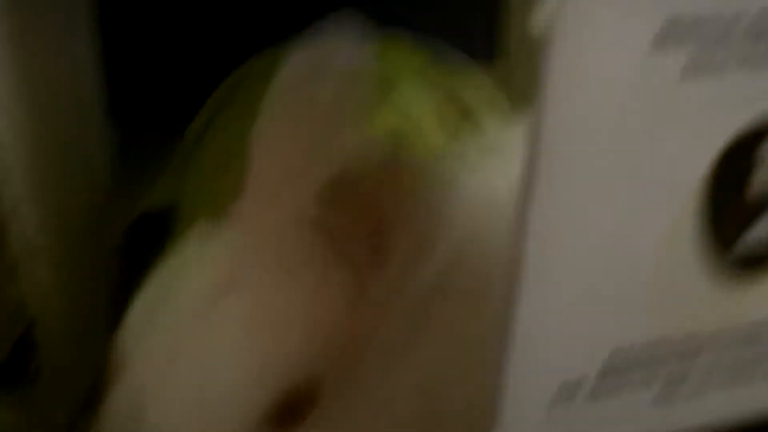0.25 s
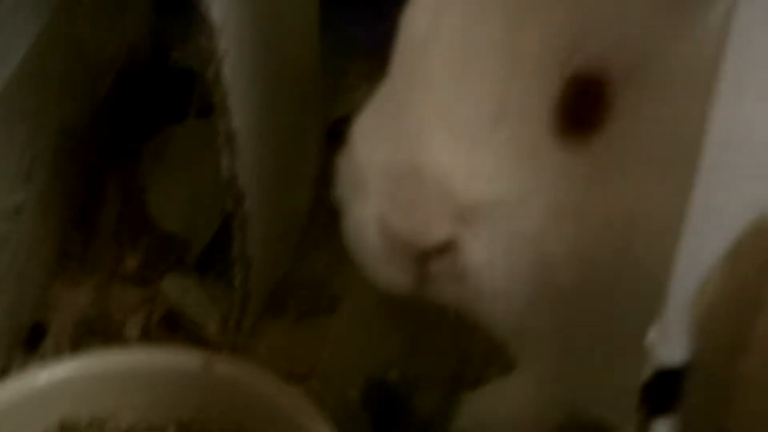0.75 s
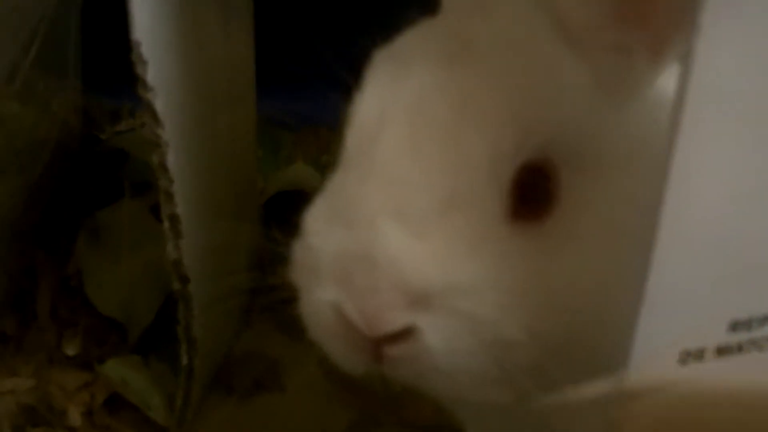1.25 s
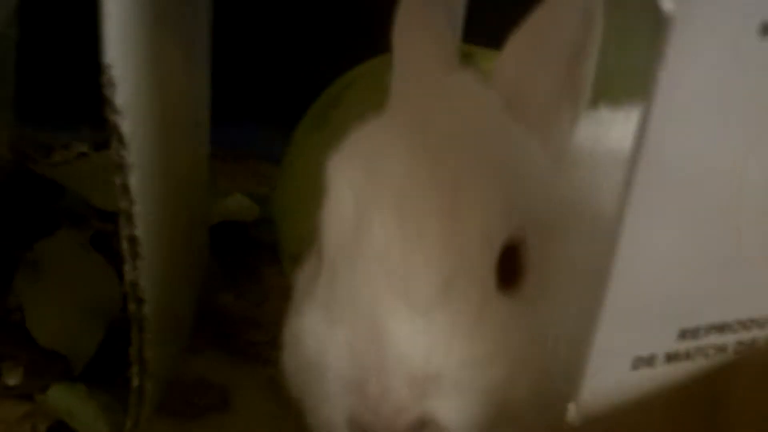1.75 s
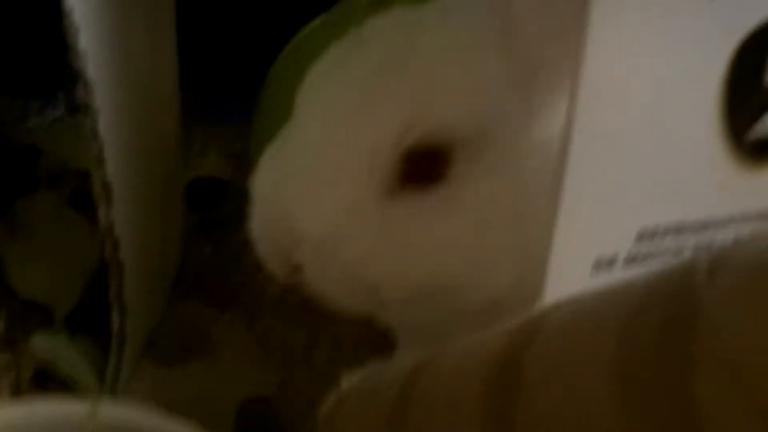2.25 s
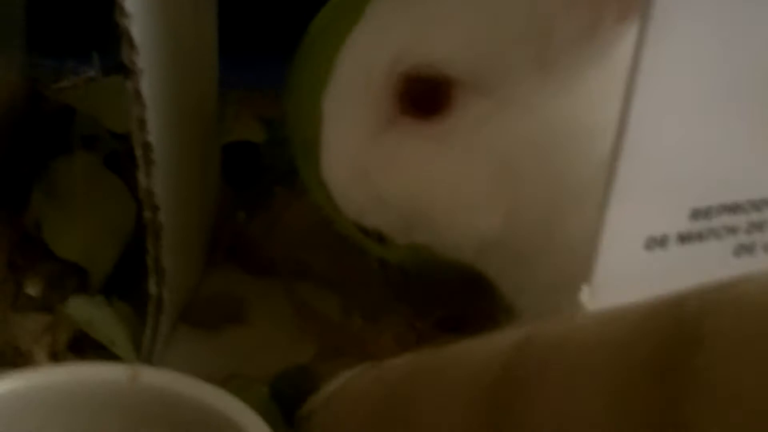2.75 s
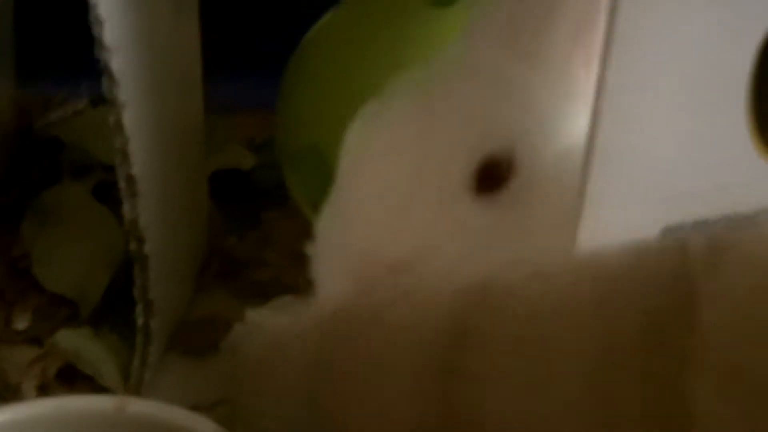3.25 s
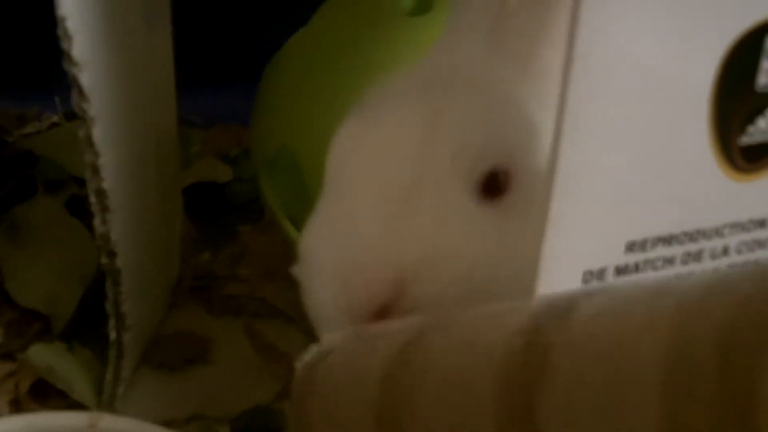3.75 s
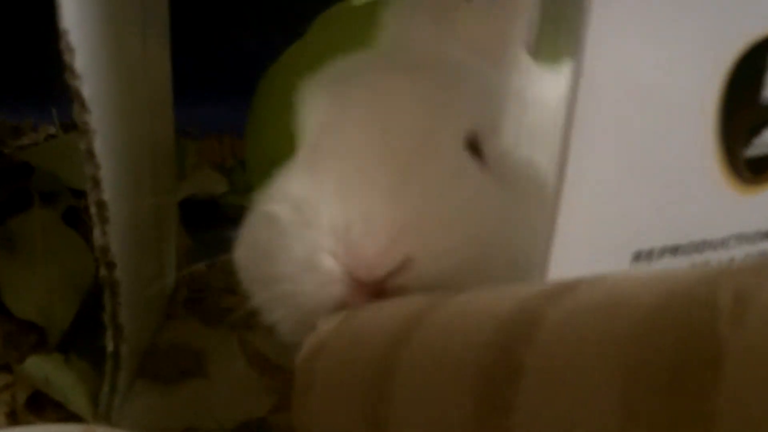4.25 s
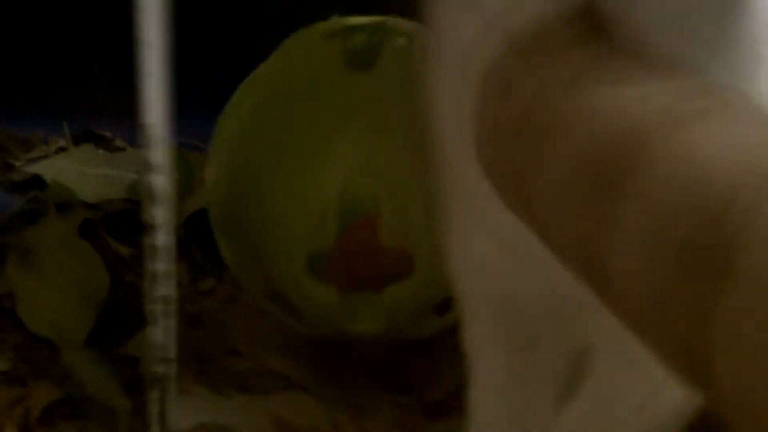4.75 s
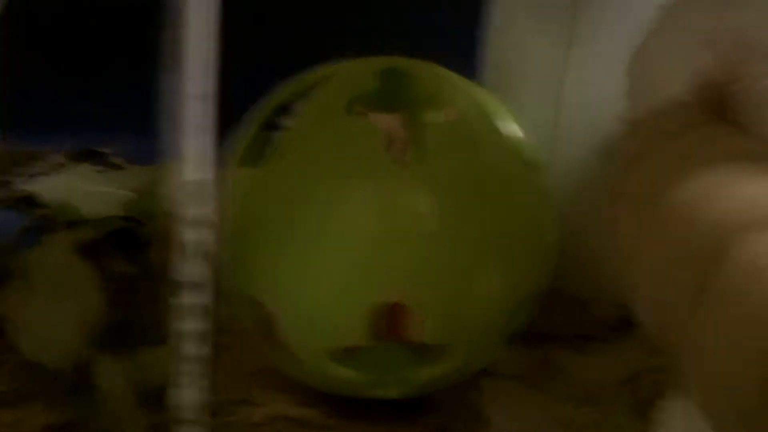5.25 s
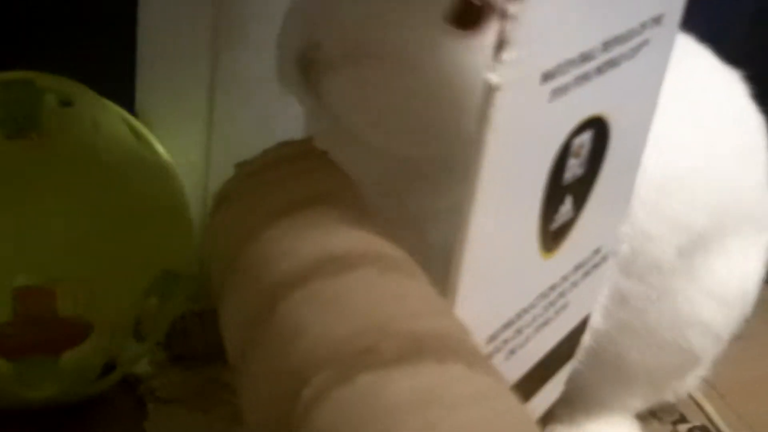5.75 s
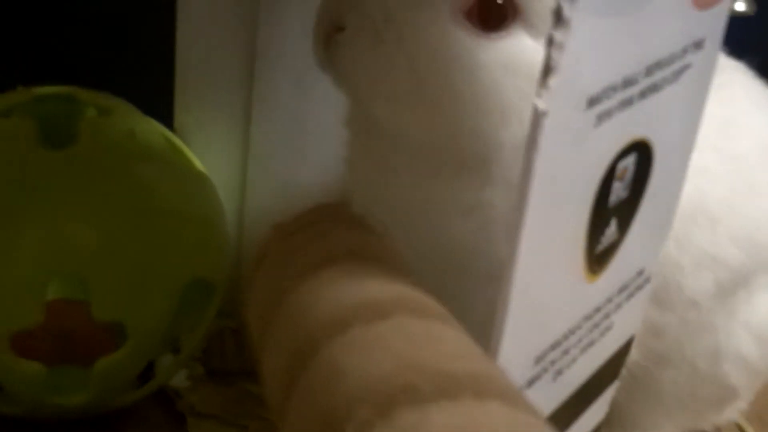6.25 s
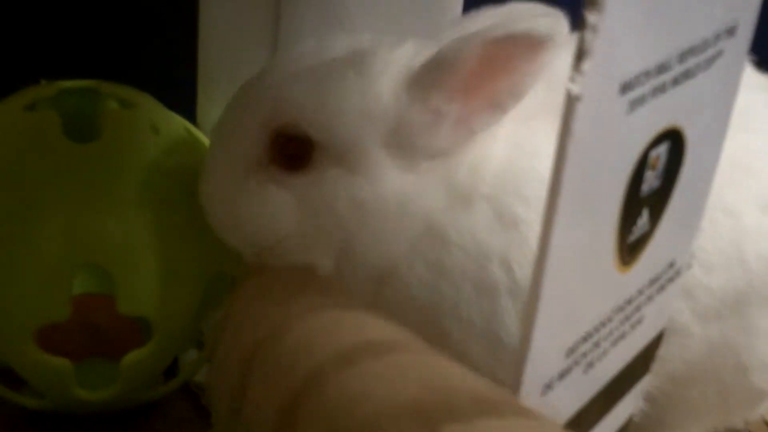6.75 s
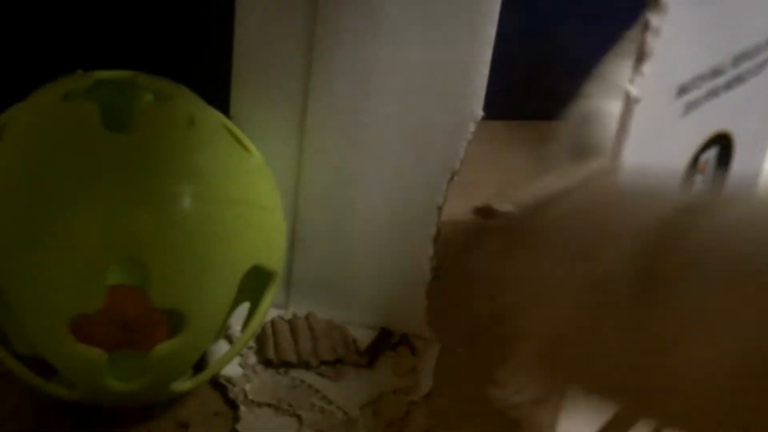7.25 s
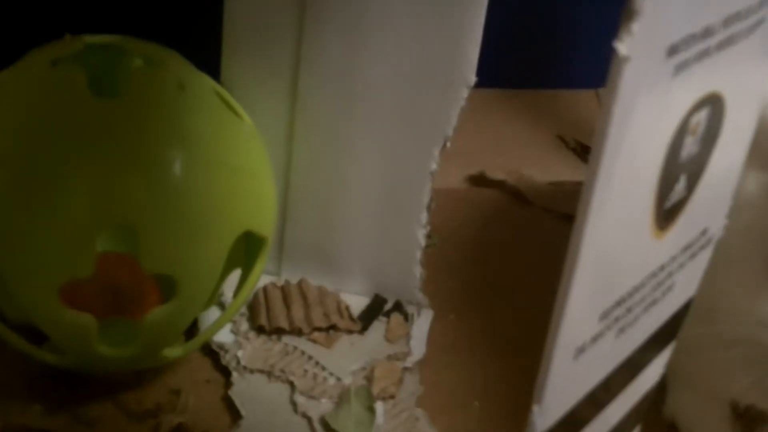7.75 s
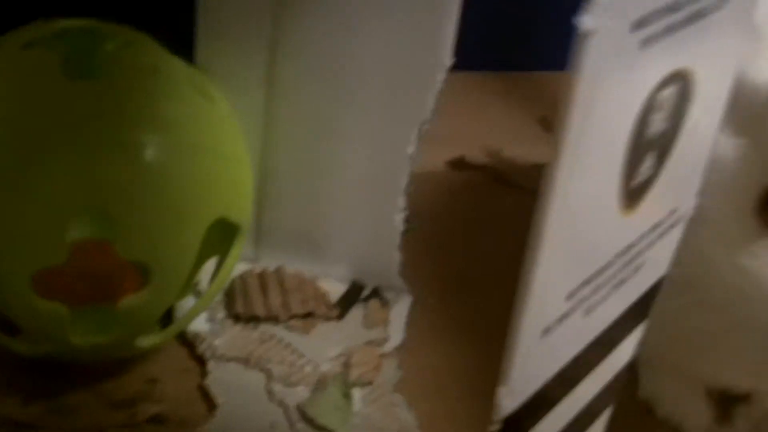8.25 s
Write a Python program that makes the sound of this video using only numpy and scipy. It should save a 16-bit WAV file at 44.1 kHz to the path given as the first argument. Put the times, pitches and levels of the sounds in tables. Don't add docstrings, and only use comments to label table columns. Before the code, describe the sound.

A small rabbit scrapes and nibbles cardboard close to the microphone, with sharp snaps, hollow box drones, soft thumps and tiny bell tinkles.

```python
import sys
import numpy as np
from scipy import signal
from scipy.fft import rfft, irfft
from scipy.io import wavfile

SR = 44100
rng = np.random.default_rng(int(sys.argv[2]) if len(sys.argv) > 2 else 0)


def nominal_scale(level):
    x = np.asarray(level, float) / 20
    return 10 ** x


def pcm_store(signal):
    levels = np.round(np.clip(np.atleast_2d(signal), -1, 1) * 32767)
    wavfile.write(sys.argv[1], SR, levels.astype(np.int16).T)


N = 375732

# t/s, peak/dB, panel
# ring f/Hz, body re peak/dB
TICKS = [(0.0004, -17.5, 4170, -13.5), (0.1045, -26, 3230, -45), (0.7225, -43.5, 4850, -7),
         (1.4695, -12.5, 3250, -27), (1.482, -12, 3540, -26), (1.495, -13, 3550, -18),
         (1.5289, -9.5, 5760, 0.5), (2.623, -33, 2600, -12), (2.873, -22.5, 2805, -8),
         (3.1928, -35, 1670, -2), (3.363, -41.5, 3620, -24), (3.594, -30.5, 3000, -3.5),
         (3.9096, -39.5, 3400, -23), (4.0191, -27, 3320, -12), (4.04, -25, 1320, -7),
         (4.057, -26, 1410, -10), (4.7553, -18, 1360, -7), (4.86, -25.5, 1460, -23),
         (4.8787, -19, 4860, -37), (4.894, -25, 1030, -11), (5.156, -33, 4850, -3),
         (5.178, -22.5, 4070, -3), (5.403, -24, 4830, -39), (5.5338, -39, 1020, 0), (5.7168, -40, 5100, -7),
         (7.147, -28.5, 2110, 6), (7.778, -43, 1520, -20), (7.827, -39, 1760, -40),
         (8.123, -27.5, 1630, -1.5), (8.1625, -25.5, 1630, -8),
         (.2693, -34, 3500, -30), (0.3424, -31, 3660, -30), (1.4698, -20, 1650, -31),
           (1.483, -18.5, 1700, -26), (1.4945, -16, 2400, -27), (1.5334, -15.5, 2200, -7),
           (1.567, -22.5, 4940, -17), (1.585, -25, 6000, -17), (1.7227, -27, 4450, -20),
           (1.7318, -22.5, 3460, -27), (1.746, -27.5, 3300, -25), (1.815, -34, 5460, -20),
           (1.9538, -32, 2080, -15), (2.1633, -45, 4900, -25), (2.1836, -39, 4900, -25),
           (2.2686, -41, 4850, -25), (2.9744, -22.5, 2200, -4.5), (2.980, -25.5, 3600, -10),
           (2.991, -32.5, 4900, -1), (3.000, -37, 4900, -7), (3.030, -31, 2000, -15),
           (3.066, -39, 2200, -12), (3.081, -30.5, 2200, -20), (3.155, -33.5, 2260, -13),
           (4.746, -20, 5860, -25), (4.768, -22, 2600, -23), (4.808, -23.5, 6240, -27),
           (4.8284, -21, 2900, -22), (4.8492, -26, 3900, -28), (4.8943, -23, 3500, -26),
           (4.9428, -30, 3600, -22), (4.9955, -29.5, 1580, -20), (5.123, -23, 2930, -15),
           (5.129, -21.5, 4950, -24), (8.2292, -37, 1000, -10), (8.4008, -31.5, 5200, 2),
           (8.48, -33, 5000, -20), (4.7695, -18, 4900, -30), (4.880, -22, 1290, -15),
           (4.4605, -41, 2100, -20), (4.317, -40, 2000, -15), (3.712, -45.5, 1600, -7),
           (3.473, -28.5, 1580, -8), (3.0485, -25, 4970, -20), (2.0654, -29.5, 2850, -22),
           (2.092, -28.5, 4900, -17)]
# t/s, peak/dB, panel ring f/Hz, body re peak/dB
TEARS = [(0.2335, -30, 1560, -42), (0.5438, -42.5, 4320, -20), (0.9988, -40.5, 1550, -2),
         (1.452, -22, 5600, -5), (1.592, -13.5, 4730, -16), (2.5617, -39, 3490, -7),
         (2.748, -33.5, 3300, 4.5), (2.8362, -25.5, 1690, -4), (3.0484, -21, 2797, -8.5),
         (3.1485, -34, 2780, -3), (3.472, -27, 4800, 0), (4.105, -42.5, 4840, -10),
         (4.7675, -22, 5000, -23), (5.0707, -23.5, 1120, -7.5), (5.2365, -21.5, 2770, -22),
         (5.3387, -33.5, 2840, -6), (5.39, -23, 2774, -18.5), (5.7787, -23, 4680, -28),
         (5.878, -31, 3670, -10), (5.9962, -40, 4900, 0.5), (7.2046, -38, 780, -11),
         (7.225, -31.5, 3600, -2), (7.6172, -34, 5130, -25), (7.808, -28.5, 3540, -24),
         (8.186, -32.5, 1650, -18)]
TICK_T60_S, TICK_HISS_DB, TICK_HISS_DB_PER_OCTAVE = 0.042, -21, 4
TEAR_T60_S, TEAR_HISS_DB, TEAR_HISS_DB_PER_BODY_DB = 0.2, -27, 0.53

# middle t/s, length/s, rms/dB, panel ring f/Hz
SCRATCHES = [(.03, 0.035, -43, 4400), (.03, 0.055, -45.5, 1550), (1.748, 0.028, -38, 4970),
             (1.802, 0.03, -46, 5100), (1.875, 0.02, -33.5, 3380), (2.085, 0.036, -35.5, 4160),
             (2.18, 0.07, -45, 4530), (2.281, 0.041, -48.5, 3700), (2.655, 0.08, -56, 4900),
             (2.721, 0.04, -53, 3530), (3.886, 0.076, -54, 3450), (3.968, 0.059, -54, 4730),
             (4.045, 0.045, -42, 1700), (4.23, 0.078, -60, 3100), (4.305, 0.04, -54.5, 4820),
             (4.362, 0.023, -46.5, 5200), (4.745, 0.06, -32.5, 2970), (4.795, 0.068, -33, 4800),
             (5.7, 0.011, -50, 4760), (6.117, .094, -61, 933), (6.954, 0.036, -52, 1370),
             (7.364, 0.0089, -46.5, 5440), (7.427, 0.053, -40.5, 4620), (7.577, 0.075, -47.5, 4970),
             (8.277, 0.03, -41.5, 2490), (8.32, 0.064, -46, 1400), (8.404, 0.024, -39.5, 1810),
             (8.49, 0.017, -43, 2500), (8.512, 0.019, -34, 1970), (8.51, 0.027, -42, 4660)]
# middle t/s, length/s, rms/dB, panel ring f/Hz
SHOVES = [(.285, 0.12, -47.5, 1440), (1.571, 0.043, -28.5, 4350), (1.63, .12, -33, 4570),
          (1.949, 0.019, -43.5, 2350), (2.004, 0.03, -41.5, 4750), (2.37, 0.022, -51, 4660),
          (2.443, 0.02, -48, 3740), (4.39, 0.025, -41.5, 2070), (4.522, 0.029, -45.5, 1770),
          (4.559, 0.027, -43.5, 4500), (4.663, 0.017, -42, 1960), (4.887, 0.037, -34.5, 2880),
          (4.936, 0.076, -43, 4360), (5.126, 0.027, -34.5, 2880), (5.173, 0.055, -35, 4350),
          (5.231, 0.016, -32.5, 2970), (7.003, 0.028, -50.5, 1940), (7.287, 0.023, -45.5, 5400),
          (7.892, 0.2, -59.5, 1706)]
# middle t/s, length/s, rms/dB, panel ring f/Hz
DRAGS = [
    (3.706, 0.023, -60.5, 1560),
    (6.424, 0.074, -58.5, 1226),
    (6.723, 0.06, -61, 1410),
    (6.89, 0.06, -60, 3400),
    (7.25, 0.021, -45, 1950),
]
# body/dB, hiss/dB re stroke rms
SCRATCH_MIX_DB, SHOVE_MIX_DB, DRAG_MIX_DB = (-14.5, -15), (-6, -15.5), (1, -13.5)

# t/s, scratch level/dB
RUB_EFFORT = [(0, -57), (.3, -53.5), (.62, -64.5), (1.1, -84.5), (1.429, -76), (1.47, -41.5), (2.1, -51.5),
              (2.5, -64.5), (4.1, -69), (4.97, -42), (5.451, -60.5), (6.15, -74.5), (7.1, -66),
              (7.35, -54.5), (7.85, -72), (8.15, -75), (8.26, -46.5), (8.45, -51.5)]
RUB_MEAN_DB, RUB_HISS_DB, HISS_DB_PER_EFFORT_DB = -62, -71.5, 0.71
BODY_RE_RUB_DB = -13

# f/Hz, density/dB per Hz
BOARD_SPECTRUM = [(200, 9), (400, -8), (700, 8), (1200, -2.5), (2000, -3.5), (3300, -3), (4300, -5.5),
                  (4900, 1), (5100, -4), (5900, -4.5), (7000, -14), (8300, -24), (11300, -11), (15000, -20)]
# f/Hz, width/Hz, level/dB
BODY_MODES = [(300, 60, -9), (410, 35, 0), (620, 70, -6), (870, 60, -8), (1390, 90, -16)]

# peak t/s, drone/dB, drone f/Hz, fade/dB per s, body re drone/dB
LEANS = [(.3, -45, 129, 70.5, -14), (1.49, -34, 123, 97, -16), (1.641, -45.5, 150, 18.5, -9),
         (2.899, -46.5, 124, 39, -9), (3.066, -40, 130, 76, -15), (3.301, -55.5, 136, 5.5, -12.5),
         (4.8, -43.5, 131, 94.5, -6), (5.17, -47, 125, 96.5, -4.5), (6.2, -57.5, 134, 0.5, -28.5),
         (6.72, -55.5, 131, 11, -15), (6.93, -50, 132, 93.5, -14), (7.801, -47.5, 135, 53, -8.5),
         (8.189, -42.5, 131, 38, -7)]
LEAN_RISE_DB_PER_S, LET_GO_S = 319.5, 0.6
BOX_REST_DB, BOX_REST_HZ, BODY_REST_DB, BOX_WIDTH_HZ = -65, 125, -73.5, 23.7
# f/Hz, width/Hz, level re body/dB
WALL_MODES = [(430.5, 33, -1), (635, 22, -11.5), (880, 53, -5), (1387, 41, -20.5), (2000, 32, -17)]
# start t/s, end t/s, rms/dB
SLIDES = [
    (2.58, 2.71, -52),
    (6.65, 6.79, -64),
    (8.22, 8.42, -52),
    (5.07, 5.13, -46),
    (4.88, 4.97, -48),
    (6.84, 7.04, -61),
    (7.78, 8.08, -58),
    (6.34, 6.46, -64),
]
# f/Hz, width/Hz, level/dB
SLIDE_MODES = [
    [(1150, 150, -1), (1500, 150, 0)],
    [(635, 50, -1), (860, 60, -3), (1423, 90, -4), (2000, 90, -4)],
    [(636, 35, -2), (930, 50, -3), (1400, 70, -3), (2550, 110, 0), (3450, 110, -3)],
    [(1020, 60, 0.5)],
    [(1000, 90, 0)],
    [(635, 45, -1), (1420, 70, 0), (2010, 80, -3), (2600, 100, -3), (3500, 150, -5)],
    [(420, 30, 0), (1650, 120, -9)],
    [(2050, 120, -2), (3600, 200, -2), (4850, 250, 0)],
]

# t/s, peak/dB, push f/Hz
THUMPS = [(0.282, -36.5, 54.7), (1.535, -19, 89.5), (1.931, -40, 60.4), (2.746, -26.5, 102),
          (2.871, -24.5, 103), (2.975, -25.5, 114), (3.048, -25.5, 86), (3.47, -33, 142),
          (3.703, -33.5, 119), (4.032, -38.5, 61.4), (4.313, -41.5, 98), (4.76, -36, 70), (5.155, -26, 111),
          (5.19, -26, 210), (5.795, -34, 68), (7.149, -35, 60), (7.315, -34.5, 70.4)]
# start t/s, end t/s, rms/dB
TRAY_HUM = (2.98, 3.72, -60.5)
# f/Hz, width/Hz, level/dB
TRAY_MODES = [(188, 17, -0.5), (420, 34, -1.5), (490, 25, -9)]

# t/s, peak/dB
KNOCKS = [
    (0.2334, -19.5),
    (.2823, -26),
    (0.3419, -38.5),
    (0.998, -32.5),
    (5.071, -35),
    (5.533, -48),
]
# f/Hz, level/dB, t60/s
BOWL_MODES = [(946, 0, .11), (1036, -2, .07), (860, -10, .04), (1180, -10, .04), (1516, -6, .045),
              (2170, -9, .035)]

# t/s, peak/dB, region f/Hz, loss per rebound/dB
BELL_HITS = [(0.0014, -31, 11760, 24), (0.0368, -36, 11400, 20), (0.058, -34, 10900, 20),
             (0.084, -29, 10900, 30), (0.1068, -33, 11000, 20), (0.1235, -39.5, 10600, 2),
             (0.2188, -33.5, 11560, 0.5), (0.253, -36, 11300, 12), (0.2693, -31, 10500, 20),
             (0.2892, -31, 10500, 12), (0.319, -29, 12300, 7), (0.27, -38, 13250, 20),
             (0.32, -42, 13250, 20), (0.3596, -35, 13250, 20), (0.382, -34, 13250, 1),
             (0.2338, -34, 9200, 3), (0.29, -31, 9200, 5), (0.382, -36.5, 9140, 4), (0.415, -31, 9070, 8),
             (0.452, -32, 10200, 20), (0.4725, -35.5, 9300, 16), (0.652, -49, 9400, 20),
             (1.0041, -56, 9300, 5), (4.943, -29.5, 11400, 27), (4.973, -27, 11400, 20),
             (4.9945, -31, 11400, 20), (5.016, -32, 11560, 2.5), (5.0857, -30.5, 10600, 4),
             (5.1154, -29, 9800, 11), (5.878, -39, 13250, 20), (6.0197, -40.5, 9900, 4.5)]
# f/Hz, level/dB, t60/s
BELL_MODES = [(9180, -7, .05), (9310, -3, .07), (9700, -9, .04), (10450, -4, .06), (10750, -3, .06),
              (11050, -2, .05), (10100, -7, .04), (12750, -7, .04), (11370, -3, .075), (11430, -5, .05),
              (11680, -2, .05), (12300, -6, .04), (13250, -2, .06)]
REBOUND_S = 0.018

# t/s, peak/dB
PRICKS = [
    (.965, -54),
    (2.494, -45),
    (2.543, -52),
    (2.59, -46),
    (6.553, -53),
    (6.593, -53),
    (6.739, -49),
    (7.383, -48),
]

ROOM_T60_S, ROOM_WET_DB = 0.29, -14.5
# f/Hz, density/dB per Hz
ROOM_TONE = [(25, -6), (130, -2), (300, -12), (1000, -16), (2500, -21), (3800, -22), (4850, -17),
             (5300, -27), (7000, -36), (8300, -36), (9400, -31), (15200, -32)]
ROOM_DB = -58
# f/Hz, rms/dB
MAINS = [(120, -70), (240, -71), (360, -77)]
# f/Hz, width/Hz, depth/dB
NOTCHES = [(4240, 500, -28), (7850, 1000, -22), (8800, 450, -24), (12600, 500, -22)]
TOP_HZ = 15250
TICK_HZ = SR / 512


def rms_one(x):
    return x / np.sqrt(np.mean(x ** 2) + 1e-20)


def in_time(rows):
    s, *columns = np.transpose(rows)
    return [np.interp(np.arange(N) / SR, s, c) for c in columns]


def band(x, low_hz, high_hz, order=2):
    return signal.sosfilt(signal.butter(order, [low_hz, high_hz], "band", fs=SR, output="sos"), x)


def colour(x, points):
    hz, db = np.transpose(points)
    grid_hz = np.arange(2049) * SR / 4096
    cepstrum = irfft(np.log(nominal_scale(np.interp(np.log(grid_hz + 1), np.log(hz), db))))
    cepstrum[1:2048] *= 2
    cepstrum[2049:] = 0
    return signal.fftconvolve(x, irfft(np.exp(rfft(cepstrum))))[:len(x)]


def drift(rate_hz):
    r = np.exp(-2 * np.pi * rate_hz / SR)
    noise = rng.standard_normal(N + 8000)
    return rms_one(signal.lfilter([1], [1, -2 * r, r * r], noise)[8000:])


def resonance(x, hz, width_hz):
    r = np.exp(-np.pi * width_hz / SR)
    zeros = np.array([1, 0, -1]) * (1 - r * r) / 2
    return signal.lfilter(zeros, [1, -2 * r * np.cos(2 * np.pi * hz / SR), r * r], x)


def grains(per_s, spread_db, clump_db):
    sizes = nominal_scale(spread_db * np.minimum(rng.exponential(1, N), 5)) * rng.choice([-1, 1], N)
    return sizes * (rng.random(N) < per_s / SR) * nominal_scale(clump_db * drift(27))


def hollow(x):
    modes = 0
    for k, (hz, width_hz, db) in enumerate(BODY_MODES):
        modes = modes + (-1) ** k * nominal_scale(db) * resonance(x, hz, width_hz)
    return rms_one(modes + nominal_scale(-16) * band(x, 250, 950, order=1))


def board_layers(per_s, spread_db, clump_db):
    slips = grains(per_s, spread_db, clump_db)
    lit = colour(slips, BOARD_SPECTRUM)
    return rms_one(band(lit, 880, 9760)), hollow(slips), rms_one(band(lit, 9480, 22000, order=4))


def panel_ring(x, hz, sharp, dull_db, ring_db):
    side = 1 if hz < 2800 else -1
    ratios = np.exp(rng.uniform([.3, .65], [.5, .9]) * side)
    neighbours = sum(.5 * resonance(x, hz * k, hz * k / sharp) for k in ratios)
    modes = resonance(x, hz, hz / sharp) + neighbours
    hump = resonance(resonance(x, hz, 1.25 * hz), hz, 1.25 * hz)
    return nominal_scale(dull_db * np.log2(hz / 5000)) * x + hump + nominal_scale(ring_db) * modes


def snaps():
    out, t = np.zeros(N + SR), np.arange(SR // 5) / SR
    panel, body, hiss = board_layers(per_s=9000., spread_db=3., clump_db=2.4)
    rows = []
    for row in TICKS:
        rows.append((*row, TICK_T60_S, TICK_HISS_DB + TICK_HISS_DB_PER_OCTAVE * np.log2(row[2] / 3000)))
    for row in TEARS:
        rows.append((*row, TEAR_T60_S, TEAR_HISS_DB + TEAR_HISS_DB_PER_BODY_DB * (row[3] + 14)))
    for s, peak_db, hz, body_db, t60_s, hiss_db in rows:
        i, j = round(s * SR), int(rng.random() * (N - len(t)))
        fibres = panel[j:j + len(t)].copy()
        fibres[:SR // 300] = rms_one(fibres[:SR // 300])
        crackle = nominal_scale(-14) * nominal_scale(-60 * t / np.clip(t60_s, .02, .4))
        shape = (1 - np.exp(-t / .001)) * (np.exp(-t / .0027) + crackle)
        crack = panel_ring(shape * fibres, hz, sharp=12., dull_db=3., ring_db=6.5)
        late = np.minimum(t / 0.0058, 1) * np.exp(-t / 0.0082)
        boom = nominal_scale(body_db - 2.5) * late * body[j:j + len(t)] / np.std(body[j:j + SR // 50])
        spray = nominal_scale(hiss_db + 4.0) * shape * hiss[j:j + len(t)]
        out[i:i + len(t)] += nominal_scale(peak_db) * (nominal_scale(3.0) * crack / np.abs(crack).max() + boom + spray)
    return out[:N]


def strokes():
    out = np.zeros(N + SR)
    panel, body, hiss = board_layers(per_s=3500., spread_db=3.6, clump_db=2.2)
    kinds = (SCRATCHES, SCRATCH_MIX_DB), (SHOVES, SHOVE_MIX_DB), (DRAGS, DRAG_MIX_DB)
    strokes_all = [(*row, *mix) for rows, mix in kinds for row in rows]
    for s, length_s, db, hz, body_db, hiss_db in strokes_all:
        n = round(2.4 * np.clip(length_s, .01, .1) * SR)
        i = max(round(s * SR) - n // 2, 0)
        along = np.linspace(-2.2, 2.2, n) + .4
        rising = along < 0
        shape = np.exp(-np.abs(along / np.where(rising, .75, 1.25)) ** np.where(rising, 4., 1.8))
        scratch = rms_one(panel_ring(panel[i:i + n], hz, sharp=13., dull_db=8., ring_db=8))
        mix = scratch + nominal_scale(body_db) * body[i:i + n] + nominal_scale(hiss_db) * hiss[i:i + n]
        out[i:i + len(scratch)] += nominal_scale(db) * shape[:len(scratch)] * mix
    return out[:N]


def leaning():
    s, db, hz, fade, body_db = np.transpose(LEANS)[:, :, None]
    after = np.arange(0, N + 64, 64) / SR - s
    fading = np.abs(fade) * after + LEAN_RISE_DB_PER_S * np.maximum(after - LET_GO_S, 0)
    lost_db = np.where(after < 0, -LEAN_RISE_DB_PER_S * after, fading)
    power, rest = nominal_scale(2 * (db - lost_db)), nominal_scale(2 * BOX_REST_DB)
    total = power.sum(0) + rest
    body = (power * nominal_scale(2 * body_db)).sum(0) + nominal_scale(2 * BODY_REST_DB)
    mean_hz = ((power * hz).sum(0) + rest * BOX_REST_HZ) / total
    return in_time(np.transpose([after[0] + s[0], 10 * np.log10(total), mean_hz, 10 * np.log10(body)]))


def rubbing():
    layers = board_layers(per_s=4000., spread_db=3.2, clump_db=1.2)
    effort_db, = in_time(RUB_EFFORT)
    body_db = 10 * np.log10(nominal_scale(2 * (effort_db + BODY_RE_RUB_DB)) + nominal_scale(2 * leaning()[2]))
    hiss_db = RUB_HISS_DB + HISS_DB_PER_EFFORT_DB * (effort_db - RUB_MEAN_DB)
    levels_db = effort_db, body_db, hiss_db
    return sum(nominal_scale(db + .8 * drift(15)) * layer for db, layer in zip(levels_db, layers))


def box():
    drone_db, hz, body_db = leaning()
    walls = 0
    for wall_hz, width_hz, db in WALL_MODES:
        walls = walls + nominal_scale(db) * rms_one(resonance(rng.standard_normal(N), wall_hz, width_hz))
    phase = 2 * np.pi * np.cumsum(hz) / SR
    wander = drift(BOX_WIDTH_HZ) * np.cos(phase) + drift(BOX_WIDTH_HZ) * np.sin(phase)
    drone = wander + 1.23 * np.cos(phase)
    rumble_db = -37.0 + 0.36 * in_time(RUB_EFFORT)[0] + 1.5 * drift(4.4)
    rumble = nominal_scale(rumble_db) * rms_one(band(rng.standard_normal(N), 3.7, 114))
    return nominal_scale(drone_db + 1.0) * rms_one(drone) + nominal_scale(body_db) * walls + rumble


def held_hum(start_s, end_s, db, modes, flutter_db):
    i, n = round(start_s * SR), round((end_s - start_s) * SR)
    t = np.arange(n) / SR
    out, held = np.zeros(N), np.clip(np.minimum(t, t[-1] - t) / 0.029, 0, 1)
    for hz, width_hz, own_db in modes:
        flutter = np.interp(t, np.arange(40) / 30, rng.standard_normal(40))
        ring = rms_one(resonance(rng.standard_normal(SR), hz, width_hz))[:n]
        out[i:i + n] += nominal_scale(db + own_db + flutter_db * flutter) * held * ring
    return out


def slides():
    return sum(held_hum(*row, modes, flutter_db=3.5) for row, modes in zip(SLIDES, SLIDE_MODES))


def thumps():
    out, t = np.zeros(N + SR), np.arange(SR // 8) / SR
    for s, peak_db, hz in THUMPS:
        i = round(s * SR)
        out[i:i + len(t)] -= nominal_scale(peak_db + 1.5) * np.sin(2 * np.pi * hz * t) * np.exp(-t * hz / 0.6)
    return out[:N]


def tray():
    return held_hum(*TRAY_HUM, TRAY_MODES, flutter_db=2.5)


def struck(hits_s, peaks_db, modes, chatter_s):
    out, t = np.zeros(N), np.arange(SR // 50) / SR
    for (hz, db, t60_s), own_db in zip(modes, peaks_db.T):
        clicks = np.full(N, 1e-18)
        clicks[np.round(hits_s * SR).astype(int)] = nominal_scale(db + own_db)
        chatter = rng.standard_normal(len(t)) * np.exp(-t / chatter_s) + 4 * (t == 0)
        at_mode = np.abs(np.sum(chatter * np.exp(-2j * np.pi * hz * t)))
        contact = signal.oaconvolve(clicks, chatter / at_mode)[:N]
        r, w = nominal_scale(-60 / (t60_s * SR)), 2 * np.pi * hz / SR
        out += signal.lfilter([0, np.sin(w)], [1, -2 * r * np.cos(w), r * r], contact)
    return out


def bowl():
    s, peak_db = np.transpose(KNOCKS)
    peaks_db = peak_db[:, None] - 6 + rng.normal(0, 0.75, (len(s), len(BOWL_MODES)))
    return band(struck(s, peaks_db, BOWL_MODES, chatter_s=0.0015), 750, 6000)


def bell():
    hits = [(s + k * REBOUND_S, db - k * loss, hz) for s, db, hz, loss in BELL_HITS for k in range(4)]
    s, peak_db, region_hz = np.transpose(hits)
    away_db = -15 * np.tanh(np.abs(np.array(BELL_MODES)[:, 0] - region_hz[:, None]) / 700)
    peaks_db = peak_db[:, None] - 6 + away_db + rng.normal(0, 3, away_db.shape)
    rings = struck(s, peaks_db, BELL_MODES, chatter_s=.003)
    tick = np.zeros(N)
    tick[np.round(s * SR).astype(int)] = nominal_scale(peak_db - 1)
    tick = signal.lfilter([1], [1, -np.exp(-1 / (0.001 * SR))], tick) * rng.standard_normal(N)
    return rings + nominal_scale(-3) * band(tick, 9000, 14000, order=4) + nominal_scale(-3) * band(tick, 2500, 6500)


def litter():
    puffs = np.zeros(N)
    s, db = np.transpose(PRICKS)
    puffs[np.round(s * SR).astype(int)] = nominal_scale(db)
    puffs = signal.lfilter([1], [1, -np.exp(-1 / (.003 * SR))], puffs + 1e-18)
    return band(puffs * rng.standard_normal(N), 2000, 7000)


def room(x):
    t = np.arange(SR // 2) / SR
    noise = band(rng.standard_normal(len(t)), 100, 6000, order=1)
    tail = noise * nominal_scale(-60 * t / ROOM_T60_S) * (t > .004)
    return signal.fftconvolve(x, tail / np.sqrt(np.sum(tail ** 2)))[:N]


def room_tone():
    t = np.arange(N) / SR
    hum = sum(np.sqrt(2) * nominal_scale(db) * np.sin(2 * np.pi * hz * t) for hz, db in MAINS)
    return nominal_scale(ROOM_DB - 8.5) * rms_one(colour(rng.standard_normal(N), ROOM_TONE)) + hum


def scene():
    near = snaps() + strokes() + rubbing() + bowl() + bell()
    low = box() + slides() + thumps() + tray()
    return (near + low + litter() + nominal_scale(ROOM_WET_DB) * room(near) + room_tone())[None]


def roll_off(x):
    return signal.sosfilt(signal.butter(12, 16500, fs=SR, output="sos"), x)


def record(dry):
    for hz, width_hz, db in NOTCHES:
        dry = dry - (1 - nominal_scale(db)) * resonance(dry, hz, width_hz)
    ticks = np.diff(np.floor(np.arange(N + 1) * TICK_HZ / SR))
    dry = dry + nominal_scale(-59) * band(ticks, 6000, 10500)
    step = signal.sosfilt(signal.ellip(6, .3, 15, TOP_HZ, fs=SR, output="sos"), dry)
    mix = signal.sosfilt(signal.cheby2(8, 25, 16200, fs=SR, output="sos"), step)
    return roll_off(mix)


dry = scene()
out = record(dry)
pcm_store(out)
```